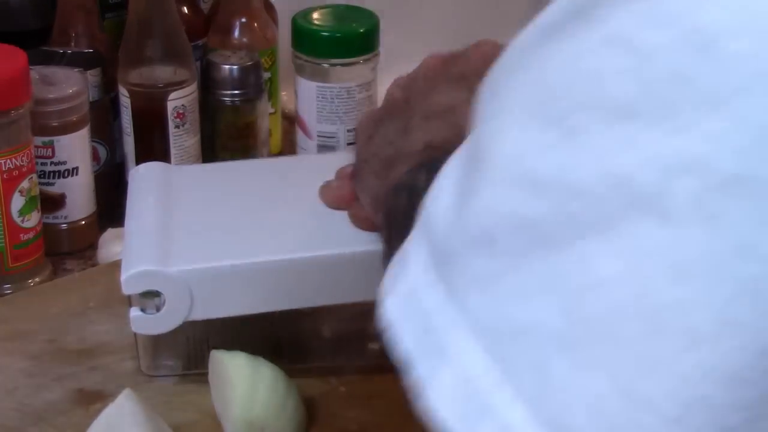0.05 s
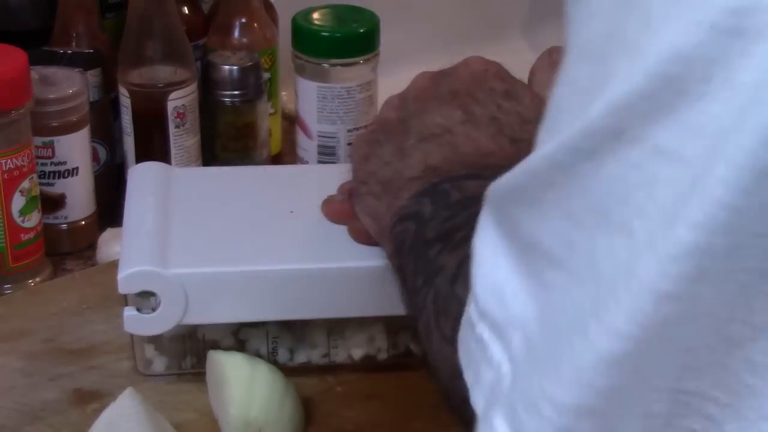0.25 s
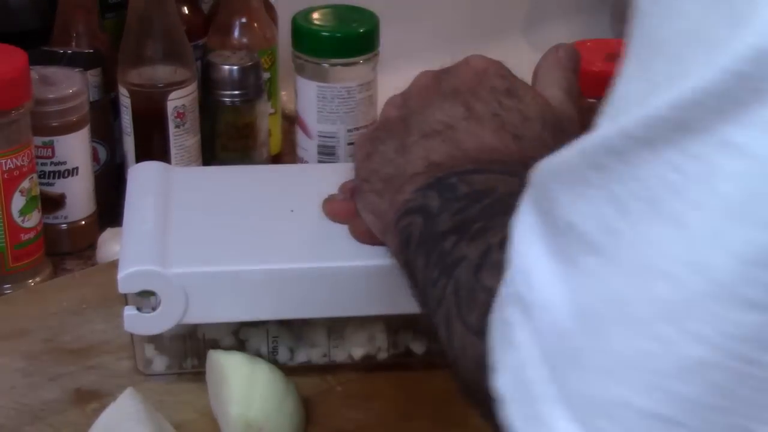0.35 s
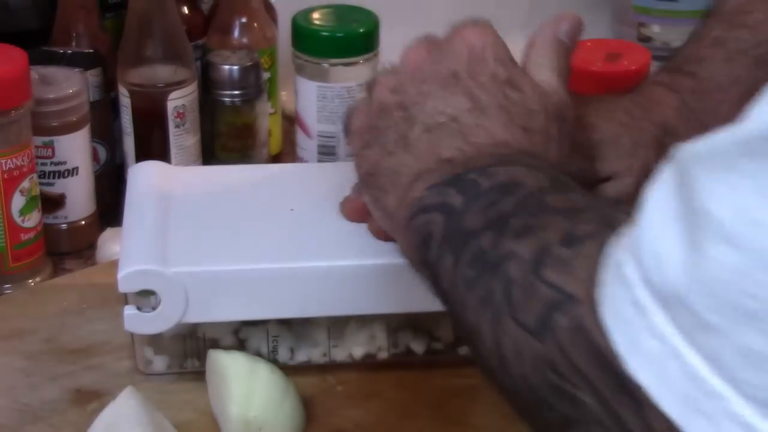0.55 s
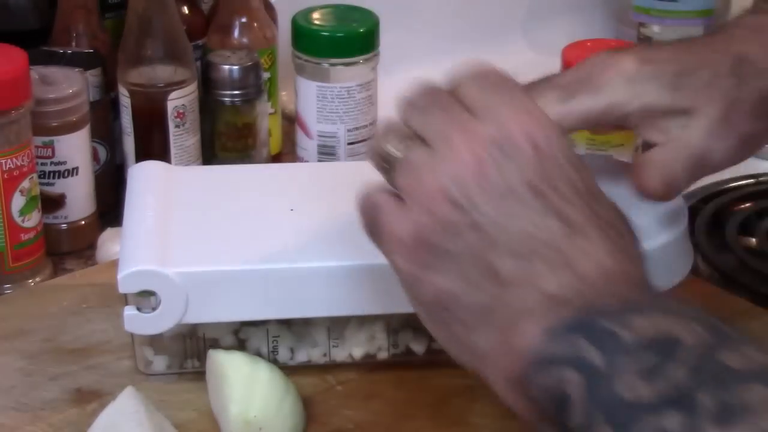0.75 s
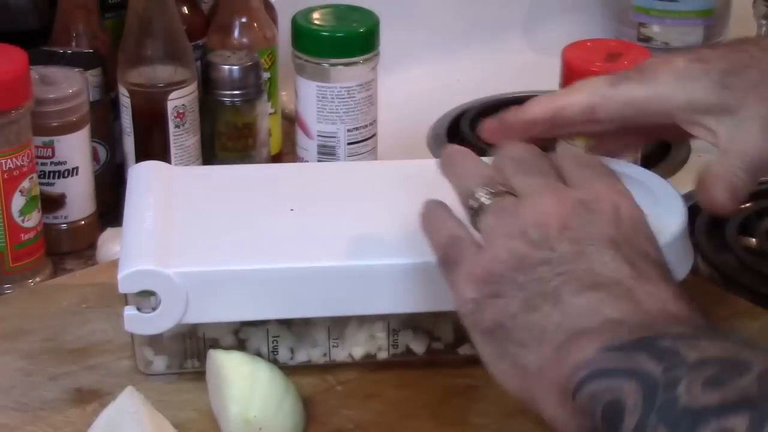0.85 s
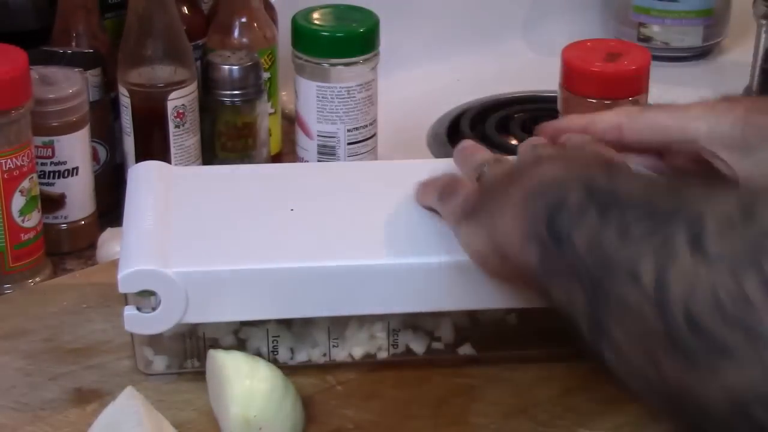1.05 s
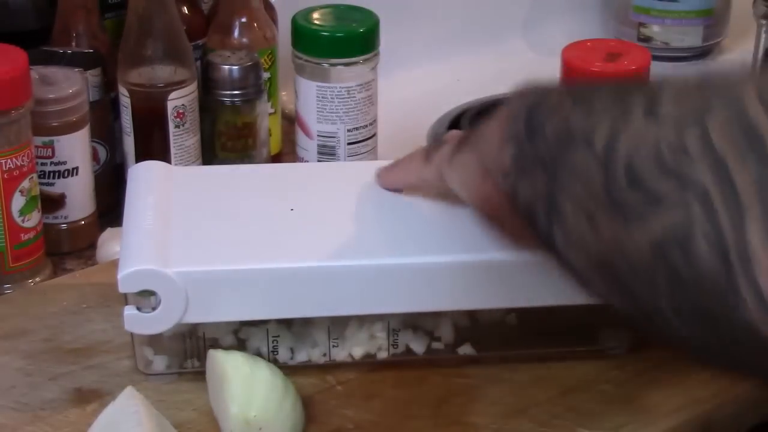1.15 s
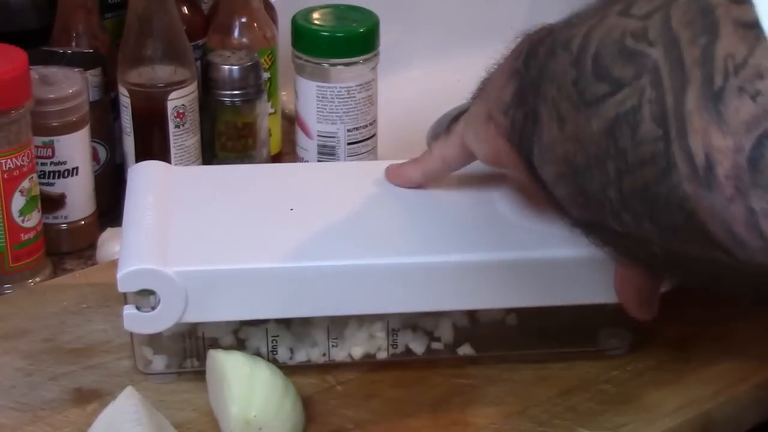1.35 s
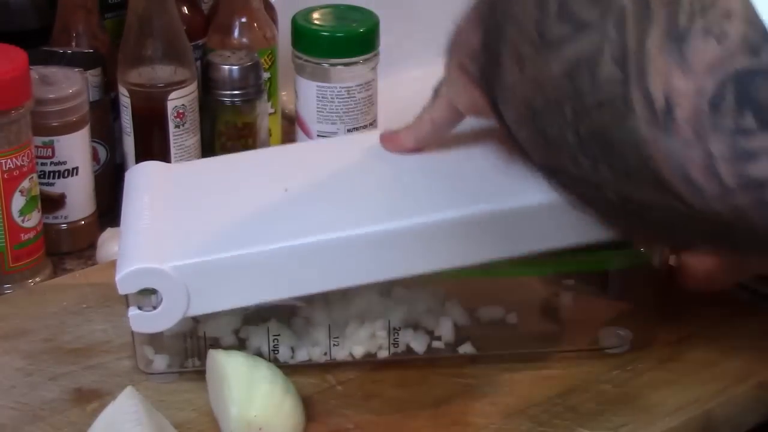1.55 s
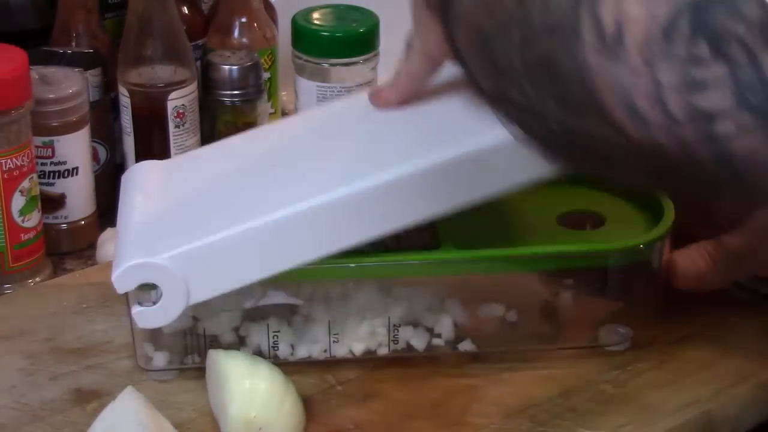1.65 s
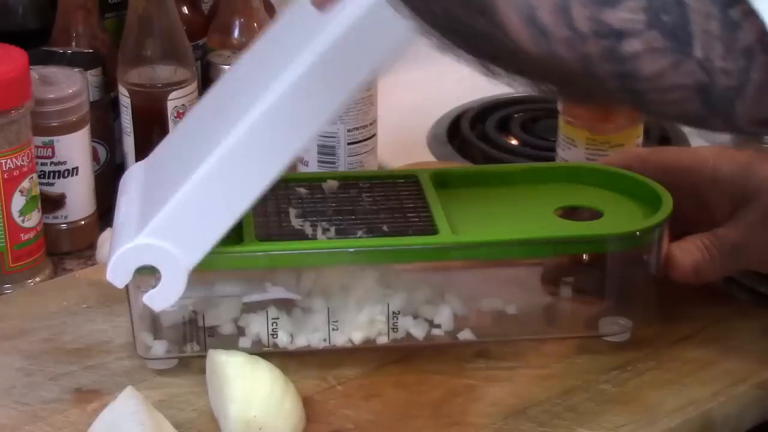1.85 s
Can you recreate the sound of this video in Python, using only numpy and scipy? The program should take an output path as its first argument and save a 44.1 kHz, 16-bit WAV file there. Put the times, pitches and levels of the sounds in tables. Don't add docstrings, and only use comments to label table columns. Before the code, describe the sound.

A hand-pressed plastic chopper crunches through onion and slams shut with a loud hollow crack, close to the microphone; the kitchen rings briefly, then fingers softly tap, rub and lift the lid over a low refrigerator drone.

```python
import sys
import numpy as np
from scipy import signal
from scipy.fft import rfft, irfft, next_fast_len
from scipy.io import wavfile

SR = 44100
rng = np.random.default_rng(int(sys.argv[2]) if len(sys.argv) > 2 else 0)


def master(y):
    cut = np.clip(np.atleast_2d(y).T, -1, 1)
    pcm = np.round(cut * 32767)
    wavfile.write(sys.argv[1], SR, pcm.astype(np.int16))


def invert_db(level):
    return 10 ** (np.asarray(level, dtype=float) / 20)


N = 83790


def unit(x):
    return x / np.sqrt(np.mean(x ** 2) + 1e-20)


def along(points, hz):
    f, v = np.transpose(points)
    return np.interp(np.log(hz + 1), np.log(f + 1), v)


def curve(rows, t):
    return np.interp(t, *np.transpose(rows))


def filtered(x, response):
    m = next_fast_len(N + SR // 2)
    spectrum = rfft(x, m) * response(np.fft.rfftfreq(m, 1 / SR))
    return irfft(spectrum, m)[..., :N]


def coloured_noise(colour):
    return unit(filtered(rng.standard_normal(N), lambda f: invert_db(along(colour, f))))


def peak(f, hz, width_hz):
    return 1j * f * width_hz / (hz * hz - f * f + 1j * f * width_hz)


def add(out, s, sound):
    part = out[round(s * SR):][:len(sound)]
    part += sound[:len(part)]


def room_tone():
    # pitch_hz, level_db (per Hz)
    air_colour = [(25, -22.5), (60, -4.5), (120, -14), (300, -7.5), (600, -20), (1400, -28.5),
                  (2600, -41.5), (9000, -44)]
    # pitch_hz, width_hz, level_db (rms)
    drone = [(59.3, 6.8, -53), (127.54, 4.8, -52), (173.1, 9, -45.5), (275, 9.1, -45), (369, 18, -53),
             (450, 90, -49), (913, 60, -58.5), (3400, 130, -72.5)]
    air_db, mains_db, mains_hz = -39.5, -37, 59.3
    out = invert_db(air_db) * coloured_noise(air_colour)
    out = out + invert_db(mains_db) * np.sin(2 * np.pi * mains_hz * np.arange(N) / SR)
    for hz, width_hz, db in drone:
        partial = filtered(rng.standard_normal(N), lambda f: np.exp(-((f - hz) / width_hz) ** 2))
        out = out + invert_db(db) * unit(partial)
    return out


def kitchen(x):
    # pitch_hz, t60_s
    decay = [(100, .6), (450, 0.54), (2000, .72), (5000, .68), (11000, 0.73)]
    paths, slice_s = 4, .006
    wide_t60_s, delay_s = 0.57, .005
    hz, t, z = signal.stft(rng.standard_normal((paths, 2, SR // 2)), SR, nperseg=256)
    fading = z * invert_db(-60 * t / along(decay, hz)[:, None])
    tail = signal.istft(fading, SR, nperseg=256)[1]
    tail[:, 1] *= invert_db(-60 * np.arange(tail.shape[-1]) / SR / wide_t60_s)
    turn = (np.arange(N) / SR / slice_s - np.arange(paths)[:, None]) % paths
    share = np.sin(np.pi / 2 * np.clip(turn, 0, 2)) / np.linalg.norm(tail[0, 0])
    mid, side = signal.fftconvolve((x * share)[:, None], tail, axes=2).sum(0)[:, :N]
    return np.pad(mid, (round(delay_s * SR), 0))[:N], side


def taps():
    # start_s, level_db (peak), pitch_hz, t60_s, click_db
    contacts = [(.7295, -11.5, 255, 0.038, -16), (.7510, -9, 197, 0.034, -32),
                (0.759, -40, 1279, 0.068, -20), (0.938, -27, 184, 0.059, -30),
                (1.003, -30, 282, 0.043, -27), (1.238, -18.5, 236, 0.043, -23),
                (1.48, -14.5, 234, 0.042, -11), (1.4803, -30.5, 3647, 0.0123, -9.5),
                (1.481, -18.5, 495, 0.015, -10), (1.482, -21.5, 950, 0.026, -19),
                (1.483, -34.5, 1800, 0.023, 3), (1.511, -20, 250, 0.073, -30),
                (1.702, -31, 950, 0.082, -10.5), (1.724, -19, 436, 0.032, -19),
                (1.7555, -13.5, 522, 0.031, -12.5), (1.7552, -26.5, 979, 0.11, -20),
                (1.757, -34.5, 2990, 0.013, -6.5), (1.757, -31.5, 2230, 0.027, -7.5),
                (1.794, -18.5, 555, 0.086, -21.5), (1.864, -33.5, 881, 0.091, -5),
                (1.895, -31.5, 700, 0.02, -8)]
    click_hz, click_s = 4970, 0.018
    thuds, clicks, t = np.zeros(N), np.zeros(N), np.arange(SR // 8) / SR
    for s, db, hz, t60, click_db in contacts:
        partials = np.sin(2 * np.pi * hz * t) + 0.27 * np.sin(2 * np.pi * 1.53 * hz * t)
        thud = invert_db(-60 * t / t60) * (1 - np.exp(-t * hz / 0.75)) * partials
        add(thuds, s, invert_db(db) * thud)
        click = invert_db(db + click_db - 60 * t / click_s) * (1 - np.exp(-t / 0.0007))
        add(clicks, s, click * rng.standard_normal(len(t)))
    return thuds + filtered(clicks, lambda f: 1 / (1 + 1j * f / click_hz) ** 4)


def squeak():
    start_s, length_s, pitch_hz, level_db = .785, .075, 790, -38
    out, t = np.zeros(N), np.arange(SR // 8) / SR
    swell = np.sin(np.pi * np.clip(t / length_s, 0, 1)) ** .5
    wander = 0.052 * np.cumsum(rng.standard_normal(len(t)))
    add(out, start_s, invert_db(level_db) * swell * np.sin(2 * np.pi * pitch_hz * t + wander))
    return out


def rubbing():
    # start_s, level_db
    effort = [(.6, -70.5), (.71, -68), (.76, -40.5), (.86, -49.5), (1.0, -52.5), (1.17, -74), (1.23, -49),
              (1.31, -68), (1.47, -56), (1.5, -48.5), (1.6, -55), (1.69, -51.5), (1.71, -44.5), (1.75, -42),
              (1.8, -43), (1.84, -49.5), (1.9, -36.5)]
    # pitch_hz, level_db (per Hz)
    colour = [(250, -31), (500, -4), (950, -1.5), (1500, -10), (2600, -18), (5000, -30), (9000, -27.5),
              (13000, -41.5)]
    slips_per_s, scatter_db = 3000, 1
    happens = rng.random(N) < slips_per_s / SR
    slips = happens * invert_db(scatter_db * rng.exponential(1, N)) * rng.standard_normal(N)
    rub = unit(filtered(slips, lambda f: invert_db(along(colour, f))))
    return rub * invert_db(curve(effort, np.arange(N) / SR)) * (np.arange(N) > effort[0][0] * SR)


def slam():
    # start_s, level_db (peak), dullness_hz, crack_db
    blows = [(.1685, -22.5, 706, -36.5), (.1755, -26.5, 715, -37), (0.2193, -26.5, 1500, -14.5),
             (0.226, -21, 2500, -14), (.2290, -15, 1780, -12.5), (0.2317, -10.5, 1500, -14),
             (.2368, -9.5, 610, -23), (.2402, -8, 6150, -9), (.2440, -13, 3003, 0), (.2520, -18, 2000, -7),
             (.2580, -20, 3454, 2)]
    # pitch_hz, level_db, t60_s
    box = [(108, -18, .3), (289.6, -7.5, 0.021), (380, -7.5, 0.024), (478, 0, 0.057), (617, 0, .04),
           (714, -1.5, 0.03), (950, -1, 0.037), (1054, -5, .025), (1357, -7.5, 0.047), (1494.5, -5, 0.028),
           (1601, 0, 0.018), (2205, -7.5, .015), (3579, 0.5, .012), (3878, 0, .012)]
    crack_s = 0.028
    out, t = np.zeros(N), np.arange(SR // 4) / SR
    hz, level, t60 = np.transpose(box)[:, :, None]
    for s, db, dull_hz, crack_db in blows:
        uneven = level + rng.normal(0, 3.1, hz.shape)
        gain = invert_db(uneven - 60 * t / t60) / (1 + (hz / dull_hz) ** 2)
        ring = (gain * np.sin(2 * np.pi * hz * t)).sum(0) * (1 - np.exp(-t / .0007))
        crack = invert_db(crack_db - 60 * t / crack_s) * (1 - np.exp(-t / .001))
        crack = crack * rng.standard_normal(len(t))
        add(out, s, invert_db(db) * (.5 * ring + crack))
    return out


def crunch():
    # start_s, level_db
    press = [
        (.13, -70),
        (.142, -46.5),
        (.16, -44.5),
        (.19, -50),
        (.214, -47.5),
        (.222, -33.5),
        (.232, -25),
        (.243, -25.5),
        (.262, -39.5),
    ]
    bursts, burst_len, bursts_per_s = 1000, 256, 7000
    middle_hz, spread, cycles, scatter_db = 2400, 0.94, 2.2, 1.5
    draw = rng.standard_normal((bursts, 1))
    chance = rng.random((bursts, 2))
    t = np.arange(burst_len) / SR
    start = press[0][0] + (np.arange(bursts) + 2 * chance[:, 0]) / bursts_per_s
    hz = np.clip(middle_hz * np.exp(spread * draw), 200, 8000)
    size = invert_db(curve(press, start) - scatter_db * np.log(chance[:, 1] + 1e-2))
    size = size * (start < press[-1][0])
    envelope = np.exp(-2 * t * hz / cycles) * (1 - np.exp(-2 * t * hz))
    grain = size[:, None] * envelope * np.sin(2 * np.pi * hz * t)
    at = (start * SR).astype(int)[:, None] + np.arange(burst_len)
    return np.bincount(at.ravel(), grain.ravel(), N)[:N]


def scene():
    chop_db, chop_wet_db, hands_wet_db, wide_db = 6, -0.5, -7.5, -13
    chop = invert_db(chop_db) * (crunch() + slam())
    hands = taps() + squeak() + rubbing()
    wet, wide = kitchen(chop)
    mid = chop + invert_db(chop_wet_db) * wet
    mid = mid + hands + invert_db(hands_wet_db) * kitchen(hands)[0] + room_tone()
    return mid + invert_db(chop_wet_db + wide_db) * wide * np.array([[1], [-1]])


def mic(f):
    presence_hz, presence_width_hz, presence_db = 3770, 1600, 11
    low_cut_hz, roll_hz, top_hz = 71, 7000, 11700
    cut = 1j * f / low_cut_hz
    presence = 1 + invert_db(presence_db) * peak(f, presence_hz, presence_width_hz)
    return presence / (1 + 1j * f / roll_hz) ** 2 * cut / (1 + cut) / (1 + (f / top_hz) ** 16)


def hiss():
    # pitch_hz, level_db (per Hz)
    colour = [(180, -90), (300, -64.5), (435, -3), (485, -11.5), (737, -10.5), (4000, -7.5), (12200, -14.5),
              (15900, -42), (22000, -120)]
    return invert_db(-65) * coloured_noise(colour) * np.array([[1], [-1]])


def low_pass(x):
    return signal.sosfilt(signal.butter(12, 12350, fs=SR, output="sos"), x)


def record(dry):
    # start_s, level_db
    gain = [
        (.235, -0.5),
        (.3, -8),
        (.4, -15.5),
        (.48, -22.5),
        (.62, -27.5),
        (1.9, -20),
    ]
    heard = filtered(dry, mic) + hiss()
    heard = heard * invert_db(curve(gain, np.arange(N) / SR))
    top = 1.7
    return low_pass(top * np.tanh(heard / top))


dry = scene()
out = record(dry)
master(out)
```